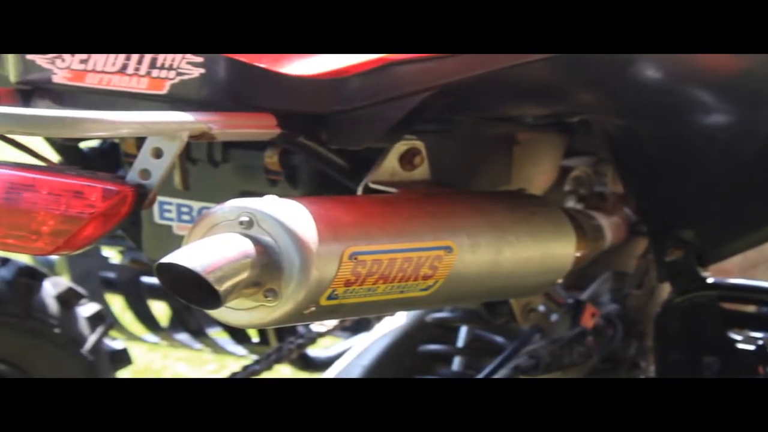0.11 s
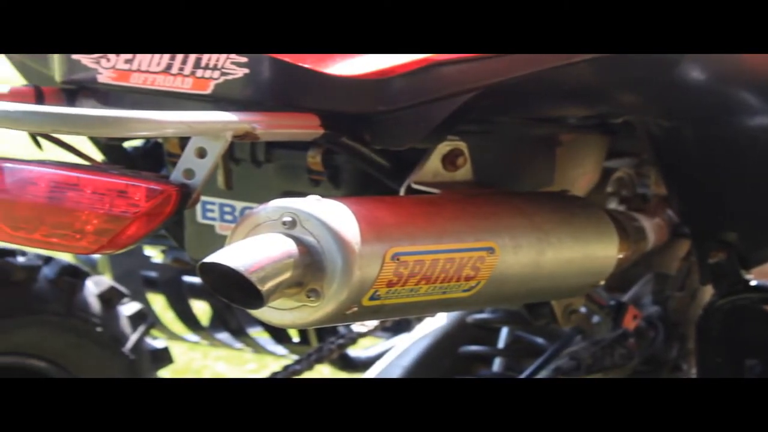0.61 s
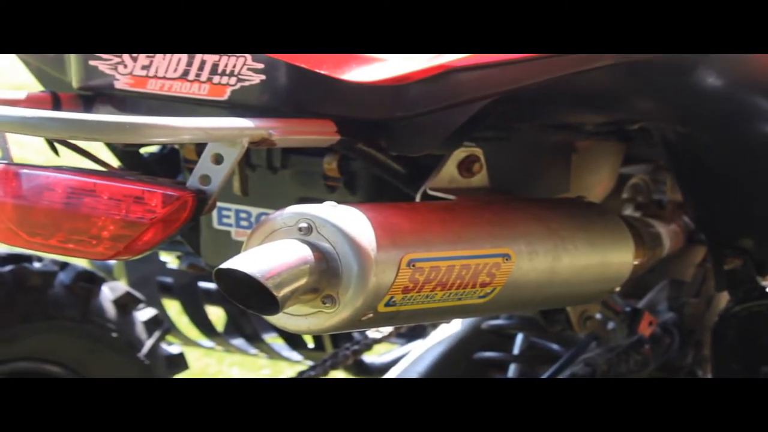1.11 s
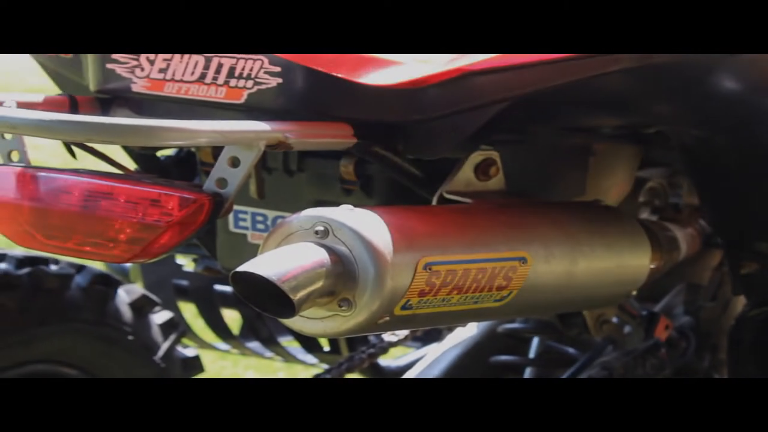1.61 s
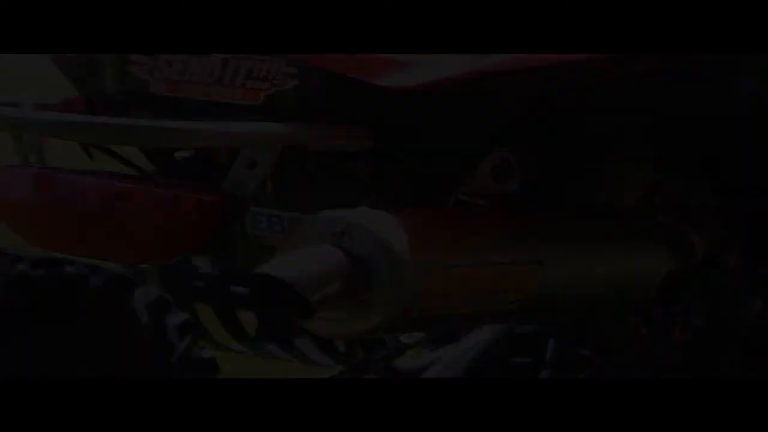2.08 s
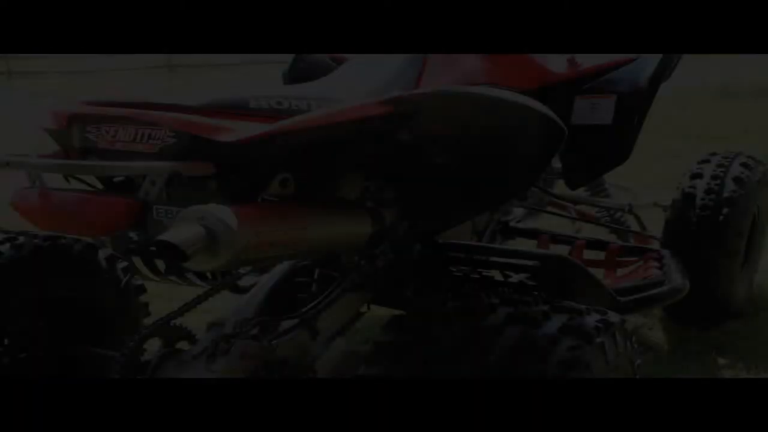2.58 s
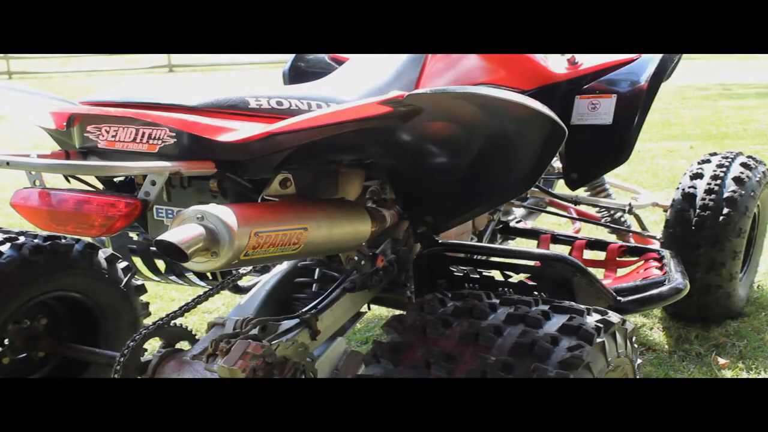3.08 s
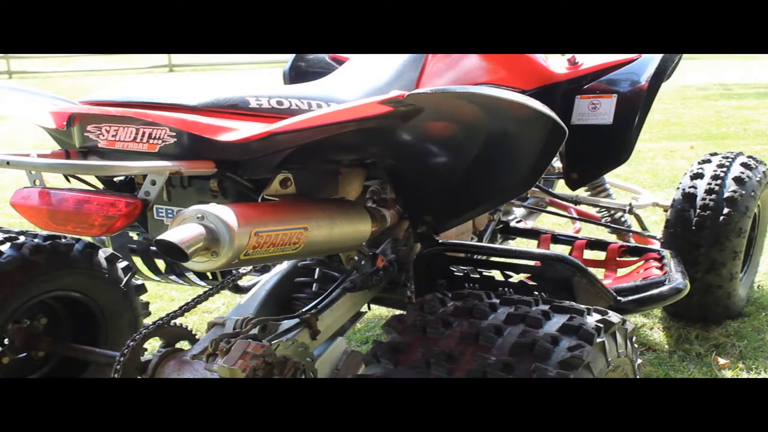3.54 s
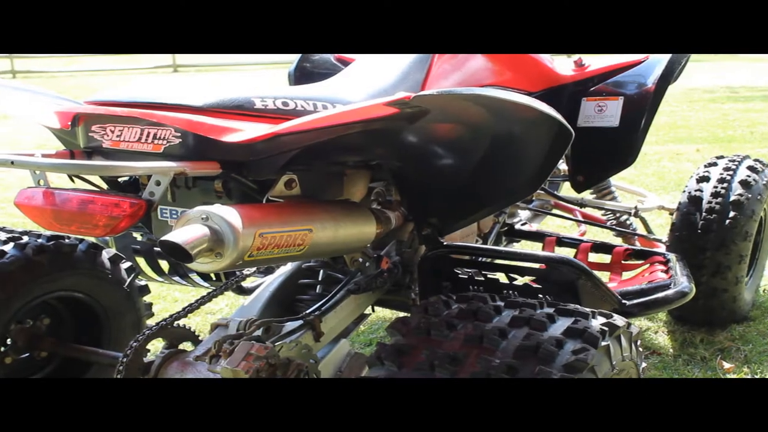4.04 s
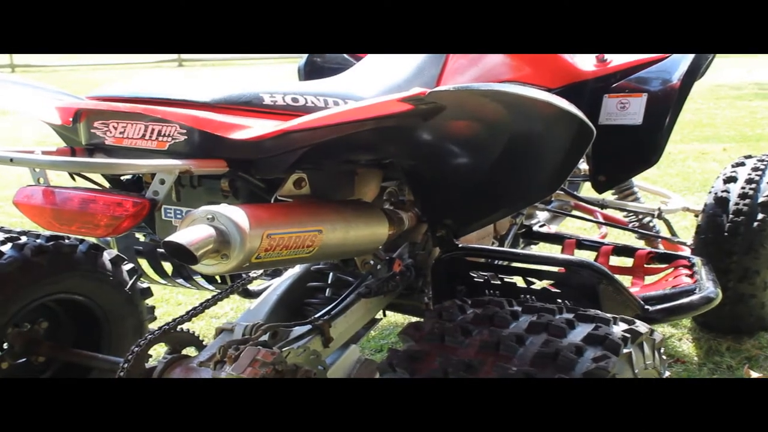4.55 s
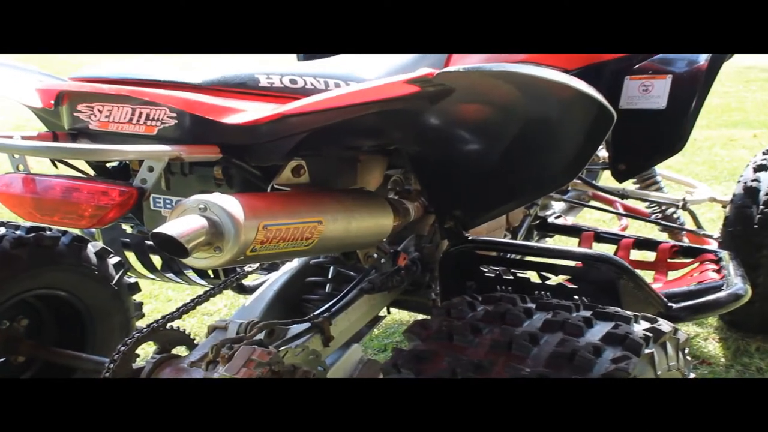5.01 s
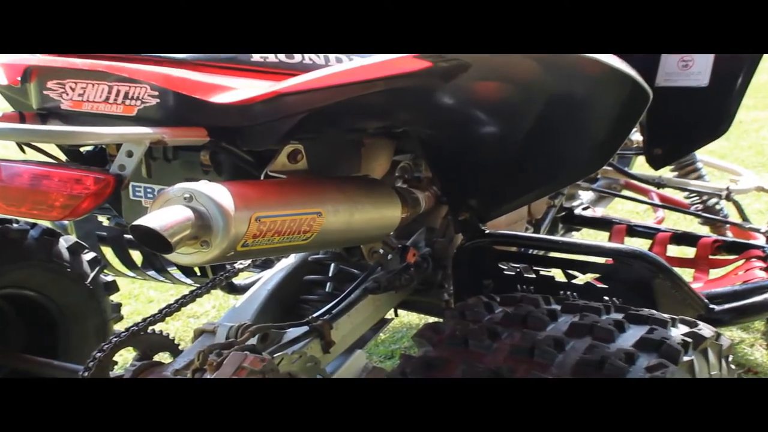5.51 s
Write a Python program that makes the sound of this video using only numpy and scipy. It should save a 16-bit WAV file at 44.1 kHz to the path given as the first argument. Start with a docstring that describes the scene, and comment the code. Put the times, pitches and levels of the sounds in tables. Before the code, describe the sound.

A steady, slightly uneven four-stroke idle: rapid hollow putts from an open pipe, each with a raspy puff of gas, backed by mechanical chatter, tiny metallic ticks and a very faint high intake whistle. It is already running at the start, drops sharply to near silence at about 2.4 seconds, and fades back up by about 3.4, heard from further round the machine. Close single microphone in the open air, little echo beyond a ground reflection.

```python
"""A single-cylinder four-stroke idles on grass, heard a step behind its open exhaust.
Each blowdown thumps as pressure pushes ring the pipe, and hisses as gas jets from the outlet.
Behind it the cases clatter as shaped noise, valves tick on head modes and the intake whistles once a cycle.
Midway the sound is cut off and fades in again; from there the engine is heard from further round."""
import sys
import numpy as np
from scipy import signal
from scipy.fft import rfft, irfft
from scipy.io import wavfile
from scipy.ndimage import uniform_filter1d

SR = 44100
rng = np.random.default_rng(int(sys.argv[2]) if len(sys.argv) > 2 else 0)


def boost(x):
    """Linear amplitude factor 10**(x/20) for a level x in decibels (scalar or array-like)."""
    u = np.asarray(x, float) / 20
    return 10 ** u


def unload_wav(signal):
    """Save mono or channel-first audio to the path in sys.argv[1] as 16-bit WAV at rate SR, clipped to [-1, 1]."""
    wavfile.write(
        sys.argv[1],
        SR,
        np.round(np.clip(np.atleast_2d(signal).T, -1, 1) * 32767).astype(np.int16),
    )


N = 248724
CUT_S = 2.356  # moment of the cut


def noise(colour, peaks=()):
    """Noise of rms 1 with a broad colour and resonances on it."""
    hz = np.fft.rfftfreq(N, 1 / SR) + 1
    colour_hz, colour_db = np.transpose(colour)
    db = np.interp(np.log(hz), np.log(colour_hz), colour_db)
    for peak_hz, width_hz, top_db in peaks:
        db += top_db / (1 + (2 * (hz - peak_hz) / width_hz) ** 2)
    x = irfft(rfft(rng.standard_normal(N)) * boost(db), N)
    return x / x.std()


def ring(hz, db, t60, t):
    """One mode: a sine that decays by 60 dB in t60 seconds."""
    return boost(db) * np.exp(-np.log(1000) * t / t60) * np.sin(2 * np.pi * hz * t)


def add(out, at_s, x):
    """Mixes x into out from a given time."""
    i = int(round(at_s * SR))
    out[max(i, 0):max(i + len(x), 0)] += x[max(-i, 0):max(len(out) - i, 0)]


def flicker(rate, db):
    """Gain gliding between random levels of spread db, rate of them a second."""
    hold = int(SR / rate)
    steps = np.repeat(rng.standard_normal(N // hold + 1), hold)[:N]
    return boost(db * uniform_filter1d(steps, hold))


# exhaust valve openings: start_s, level_db (blowdown strength)
FIRING_TIMES = [(0.0372, -0.2), (0.1326, -0.5), (0.2325, 0), (0.3267, 0), (0.421, -1.5), (0.5202, -0.8),
                (0.613, 0.5), (0.71, -1.7), (0.809, 0.9), (0.91, -0.4), (1.003, 0.8), (1.098, -1),
                (1.1976, 0), (1.2988, -0.1), (1.3967, 1), (1.495, -1), (1.591, -0.5), (1.6846, -0.1),
                (1.785, 0.1), (1.8837, -0.5), (1.9753, 0.5), (2.0665, -0.5), (2.1534, 0), (2.2414, -1.8),
                (2.336, 0.7), (2.375, -12), (2.462, -0.8), (2.5505, -0.5), (2.644, -1), (2.7393, 0),
                (2.8342, -0.5), (2.9271, -1), (3.0214, -1.5), (3.1209, -0.5), (3.2213, 0.4), (3.3243, 0),
                (3.4234, -0.2), (3.523, -0.9), (3.6137, -0.3), (3.7093, -0.5), (3.803, 1.1), (3.9002, -0.5),
                (3.998, -0.5), (4.0917, 0.1), (4.1908, 0), (4.2867, -0.5), (4.384, -0.5), (4.479, -0.4),
                (4.5794, -0.6), (4.6757, 0.5), (4.7742, -0.8), (4.8672, 0), (4.9566, 0), (5.0466, -1),
                (5.141, 1.0), (5.2367, 0.1), (5.3286, 0), (5.4242, 1), (5.517, -1.0), (5.6172, 1.9)]


def cycles():
    """Start, length and strength of every engine cycle, with the one already under way."""
    starts, levels = np.transpose(FIRING_TIMES)
    usual = np.median(np.diff(starts))
    starts, levels = np.r_[starts[0] - usual, starts], np.r_[0, levels]
    lengths = np.minimum(np.r_[np.diff(starts), usual], 1.08 * usual)
    return starts, lengths, levels


def crank():
    """Crank position as the share of the cycle at each sample."""
    starts, lengths, _ = cycles()
    t = np.arange(N) / SR
    k = np.searchsorted(starts, t, side="right") - 1
    return np.clip((t - starts[k]) / lengths[k], 0, 1)


# intake whistle through the cycle: cycle_share, pitch_hz, level_db
WHISTLE_PATH = [(.5, 10800, -90), (.56, 10700, -77), (.66, 10940, -74), (.72, 11000, -80), (.8, 10650, -80),
                (.86, 10850, -100)]


def whistle():
    """Air drawn through a narrow gap sings, a wavering sine, while the intake is open."""
    share, hz, db = np.transpose(WHISTLE_PATH)
    angle = crank()
    pitch = np.interp(angle, share, hz) * flicker(150, 0.023)
    level = boost(np.interp(angle, share, db, left=-120, right=-120)) * flicker(60, 2.5)
    return level * np.sin(2 * np.pi * np.cumsum(pitch) / SR)


VALVE_DB = -53
# valves seating: cycle_share, level_db (relative)
VALVE_SEATINGS = [(.665, -6), (0.65, -3), (0.32, -8)]
# modes of the cylinder head: pitch_hz, level_db (relative), t60_s
HEAD_MODES = [(2600, 5, 0.013), (3750, -6.5, 0.011), (4000, 1.5, 0.013), (4330, -13, 0.0064),
              (6000, -11, 0.0049), (7800, -12, 0.0069), (8060, -6.5, 0.011), (9000, -14, 0.0067),
              (9300, -15, .009), (12300, -25, .005)]


def valves():
    """Each seating valve is a short noise rattle that rings the cylinder head."""
    out, t = np.zeros(N), np.arange(SR // 16) / SR
    starts, lengths, _ = cycles()
    head = sum(ring(hz, db, t60, t) for hz, db, t60 in HEAD_MODES)
    shape = len(starts), len(VALVE_SEATINGS)
    rattle = rng.standard_normal((*shape, 500)) * np.exp(-np.arange(500) / 160) / 5
    rattle *= boost(1.25 * rng.standard_normal((*shape, 1)))  # no two seat alike
    for start, length, blows in zip(starts, lengths, rattle):
        for (share, db), blow in zip(VALVE_SEATINGS, blows):
            add(out, start + share * length, boost(VALVE_DB + db) * signal.fftconvolve(head, blow))
    return out


CASES_DB = -45.5
SWELL_OCTAVES = 1.067  # how far a swell spreads round its brightest pitch
# broad colour of the engine cases: pitch_hz, level_db (per Hz, relative)
CASE_COLOUR = [(150, -4), (400, -1.5), (800, -10), (1500, -12.5), (3000, -20), (4400, -19.5), (5500, -27.5),
               (8000, -35), (11000, -41), (14000, -56), (17000, -77)]
# resonances of the cases: pitch_hz, width_hz, level_db (over the broad colour)
CASE_RESONANCES = [(504, 42, 3.5), (772, 62, 5.5), (865, 57, 7.5), (1079, 67, 6), (1340, 200, 4),
                   (1820, 67, 4), (2595, 210, 6.5), (3195, 91, 5.5), (3660, 270, 6.5), (4240, 50, 5),
                   (5190, 120, 1.5)]
# crank angles where the clatter swells: cycle_share, width_share, level_db (over the lull), brightest_hz
CLATTER_SWELLS = [(.11, 0.056, 12.5, 1330), (.33, 0.12, 12, 560), (.77, 0.02, 9, 420),
                  (.87, 0.03, 10.5, 1000), (.99, 0.055, 8.5, 900)]
# low, middle and high clatter between swells: centre_hz, level_db (relative)
CLATTER_LULL = [(400, -5), (1150, -6.5), (3300, -1.5)]


def cases():
    """Chain, gears and piston rattle through the cases, noise that is louder at some crank angles."""
    x, angle = noise(CASE_COLOUR, CASE_RESONANCES), crank()
    low, mid, high = (signal.sosfiltfilt(signal.butter(2, hz, fs=SR, output="sos"), x)
                      for hz in (650, 2000, 4800))
    # after the cut the engine is heard from further round: less treble, more middle
    turned = np.arange(N) / SR > CUT_S
    middle = (mid - low) * boost(0.27 * turned)
    treble = (high - mid) * boost(-0.8 * turned) + (x - high) * boost(-3 * turned)
    out = 0
    for band, (centre_hz, lull_db) in zip((low, middle, treble), CLATTER_LULL):
        power = 1
        for share, width, db, brightest_hz in CLATTER_SWELLS:
            away = (angle - share + 0.5) % 1 - 0.5  # shortest way round the cycle
            octaves = np.log2(centre_hz / brightest_hz)
            nearness = np.exp(-0.5 * (away / width) ** 2 - (octaves / SWELL_OCTAVES) ** 2)
            power = power + boost(2 * db) * nearness
        out = out + band * boost(lull_db) * np.sqrt(power) * flicker(150, 2.04) * flicker(25, 0.94)
    return boost(CASES_DB) * out


JET_DB, FRONT_DB = -35.5, -25.5
# the jet follows the blowdown (dB per dB), scatters by itself, and is softer from the side after the cut
JET_PER_DB, JET_LIFT_DB, JET_SCATTER_DB, JET_TURNED_DB = 0.75, 1.76, 1.87, -3
# pipe and silencer modes before each cycle's scatter: pitch_hz, level_db, t60_s, outlet_sign (with size)
PIPE_MODES = [(67.8, -26.5, 0.2, -1.08), (93, -9.5, 0.023, -1.03), (140.56, -14, 0.16, 0.93),
              (157.3, -7.5, 0.021, 0.99), (255.2, -10.5, 0.054, 1), (300.7, -4.5, 0.068, -0.98),
              (344, -32.5, 0.071, -2.04), (384.8, -11, 0.035, 0.97), (480.7, -18.5, 0.023, -1.037),
              (584.6, -28.5, 0.016, 0.88)]
# pushes into the pipe, blowdown then suction as the valve closes: cycle_share, size, rise_ms
PIPE_PUSHES = [(0, 1, 0.12), (0.268, -0.23, 0.97)]
# turbulent jet at the outlet: pitch_hz, level_db (per Hz, relative)
JET_COLOUR = [(300, -4.5), (700, -1.5), (1200, -3.5), (2200, -12.5), (4000, -16.5), (6000, -20.5),
              (8000, -20), (11000, -21.5), (13000, -30.5), (15000, -45.5), (18000, -65)]


def pipe_ring(db, chance, t):
    """The pipe's ringing for one cycle; gas heat shifts its tuning a little."""
    out = 0
    for (hz, mode_db, t60, sign), (tune, level, decay) in zip(PIPE_MODES, chance):
        # a stronger blowdown has a steeper front and drives the upper modes harder
        driven_db = mode_db + 0.15 * level + 0.055 * db * np.log2(hz / 140)
        out = out + sign * ring(hz * (1 + 0.0051 * tune), driven_db, t60 * boost(0.38 * decay), t)
    return out


def exhaust():
    """Pressure pushes ring the pipe and gas hisses out in puffs; returns thump and jet."""
    thump, flow, front = np.zeros((3, N))
    t = np.arange(SR // 4) / SR
    push_t = t[:SR // 50]
    starts, lengths, levels = cycles()
    jets = JET_LIFT_DB + JET_PER_DB * levels + JET_SCATTER_DB * rng.standard_normal(len(starts))
    jets += JET_TURNED_DB * (starts > CUT_S)
    # gas leaves in puffs, one per round trip of the pressure wave, over a dying stream
    stream = 0.13 * np.exp(-t / 0.023) * (t > 0.002)
    for at_s, width_s, size in [(0.005, 0.00089, 0.29), (0.0105, 0.002, 0.5), (0.0175, 0.003, 0.18)]:
        stream += size * np.exp(-0.5 * ((t - at_s) / width_s) ** 2)
    # the first gas bursts out at once, in small fast eddies
    burst = (1 - np.exp(-t / 0.00062)) * np.exp(-t / 0.0017)
    chance = rng.standard_normal((len(starts), len(PIPE_MODES), 3))
    for start, length, db, jet_db, cycle_chance in zip(starts, lengths, levels, jets, chance):
        pipe = pipe_ring(db, cycle_chance, t)
        for share, size, rise_ms in PIPE_PUSHES:
            push = push_t * np.exp(-push_t / (rise_ms / 1000))
            pushed = signal.fftconvolve(pipe, push / push.sum())
            add(thump, start + share * length, boost(db) * size * pushed)
        add(front, start + 0.0022, boost(db + jet_db) * burst)
        add(flow, start, boost(db + jet_db) * stream)
    # the thump carries little above 1.5 kHz
    thump = signal.sosfilt(signal.butter(2, 1500, fs=SR, output="sos"), thump)
    eddies = signal.sosfilt(signal.butter(1, 7000, "high", fs=SR, output="sos"), noise(JET_COLOUR))
    jet = boost(JET_DB) * flow * noise(JET_COLOUR) + boost(FRONT_DB) * front * eddies
    return thump, jet * flicker(1500, 4.4)


# echoes of the thump, off the ground and a late inverted return: delay_ms, share
THUMP_ECHOES = [(1.65, 0.52), (60, -0.0214)]


def scene():
    """The exhaust comes direct and by its echoes; the engine stands behind it."""
    thump, jet = exhaust()
    out = whistle() + valves() + cases() + jet + thump
    for delay_ms, share in THUMP_ECHOES:
        add(out, delay_ms / 1000, share * thump)
    return out[None]


def microphone(x):
    """A second-order high-pass: the microphone loses the deep bass."""
    low_hz, damping = 60.3, 0.62
    low = 2 * np.pi * low_hz
    b, a = signal.bilinear([1, 0, 0], [1, damping * low, low ** 2], SR)
    return signal.lfilter(b, a, x)


def fader():
    """Gain that drops at the cut, then rises from its depth, fast at first and gently at the top."""
    cut_ms, fade_s, depth_db, power = 0.12, 1, -48.5, 3.26
    t = np.arange(N) / SR - CUT_S
    falling = np.clip(-t / (cut_ms / 1000), 0, 1)
    rising = boost(depth_db * np.clip(1 - t / fade_s, 0, 1) ** power)
    return np.maximum(falling, rising)


def top_cut(x):
    """Nothing passes above the cut-off."""
    return signal.sosfilt(signal.butter(12, 18000, fs=SR, output="sos"), x)


def record(dry):
    """The microphone hears the scene; the fader cuts and comes back up."""
    mix = microphone(dry) * fader()
    return top_cut(mix)


dry = scene()
out = record(dry)
unload_wav(out)
```